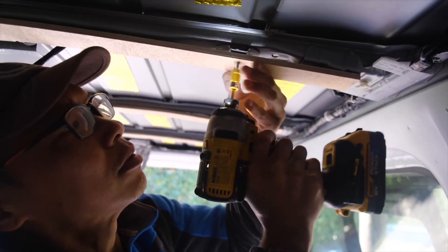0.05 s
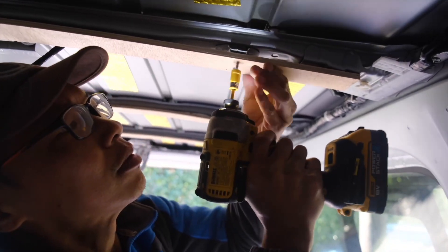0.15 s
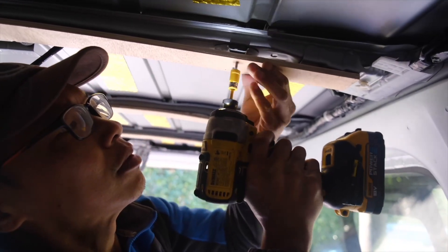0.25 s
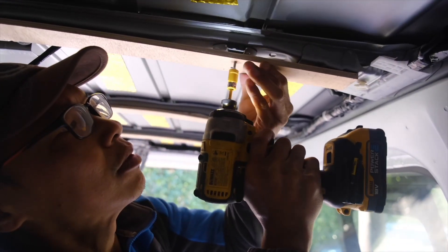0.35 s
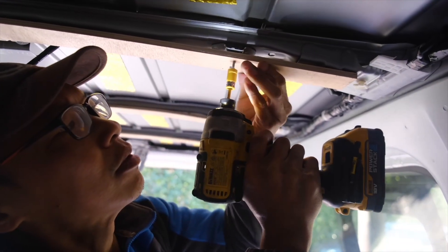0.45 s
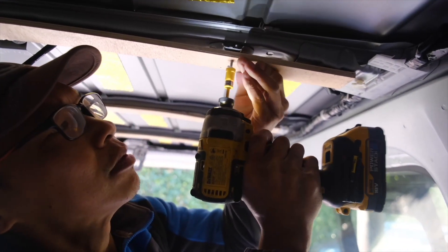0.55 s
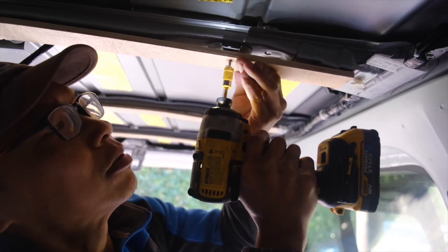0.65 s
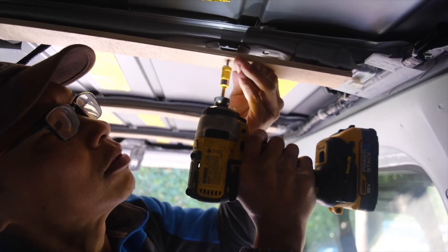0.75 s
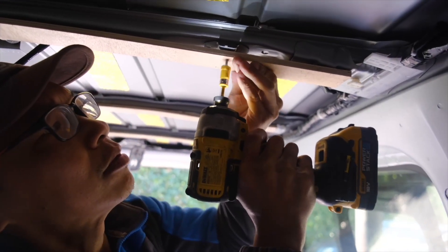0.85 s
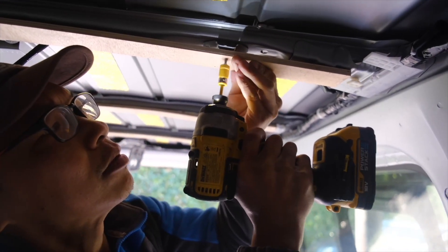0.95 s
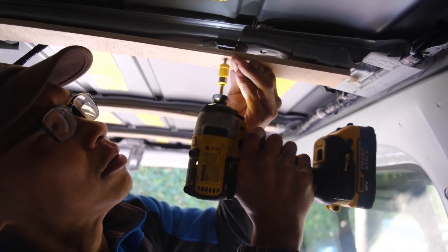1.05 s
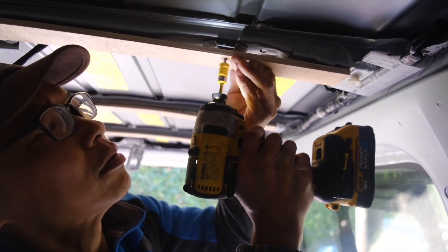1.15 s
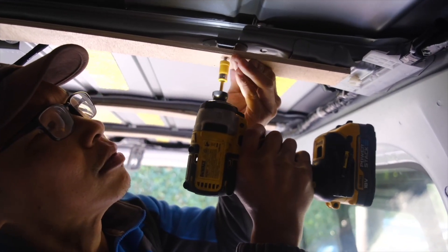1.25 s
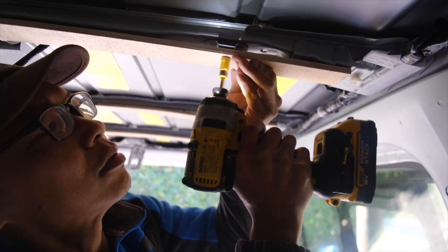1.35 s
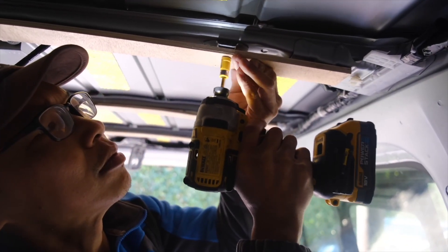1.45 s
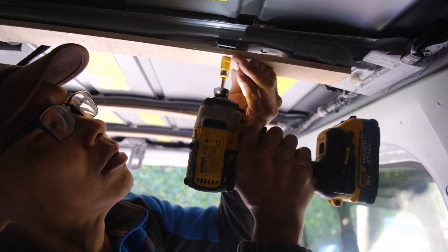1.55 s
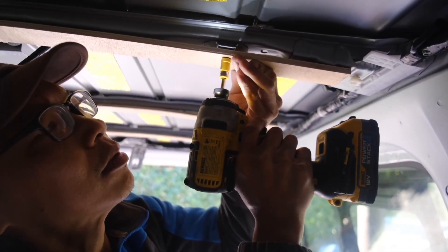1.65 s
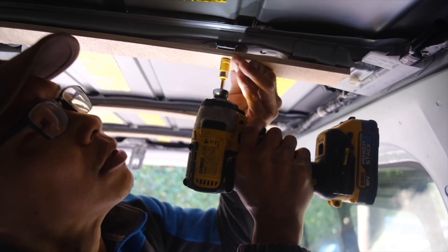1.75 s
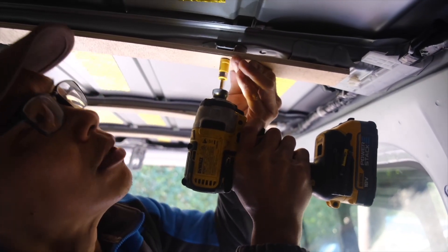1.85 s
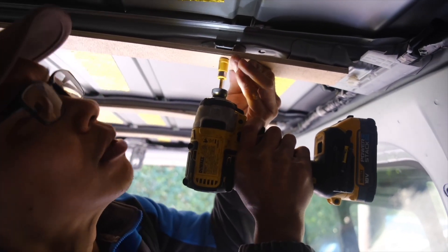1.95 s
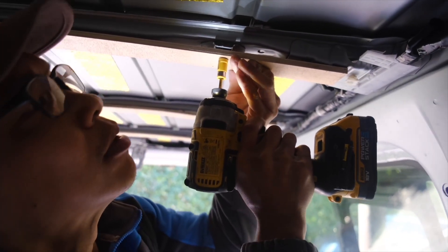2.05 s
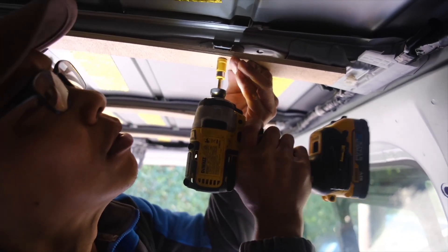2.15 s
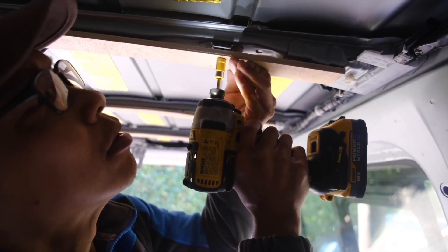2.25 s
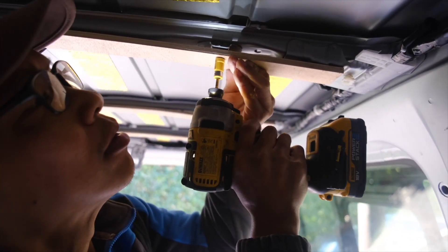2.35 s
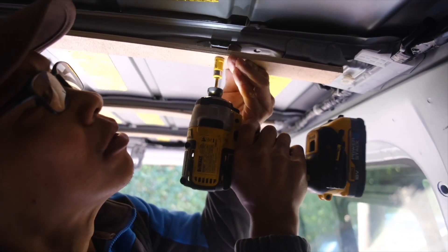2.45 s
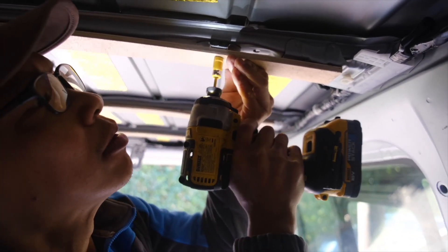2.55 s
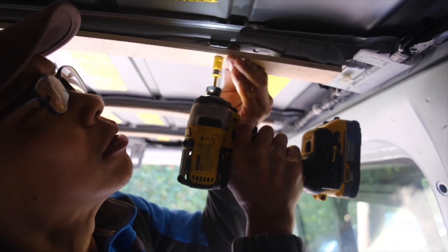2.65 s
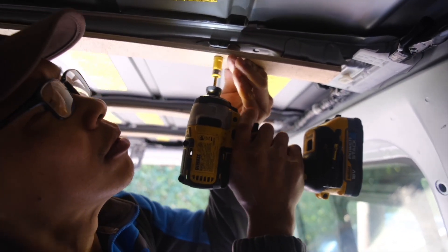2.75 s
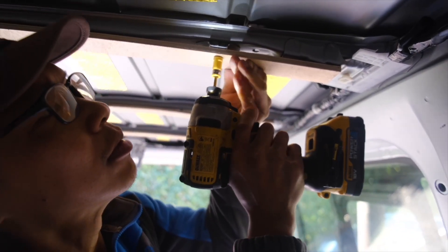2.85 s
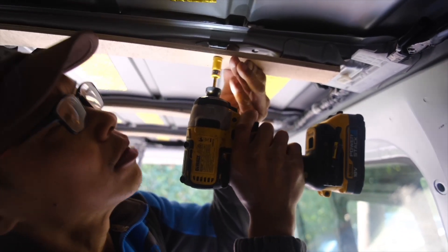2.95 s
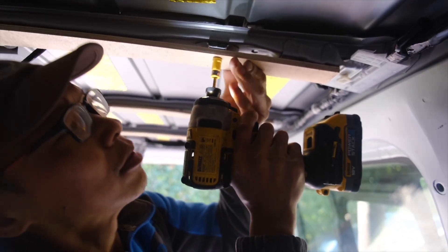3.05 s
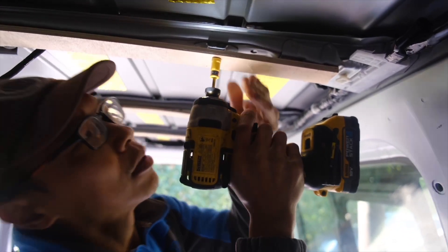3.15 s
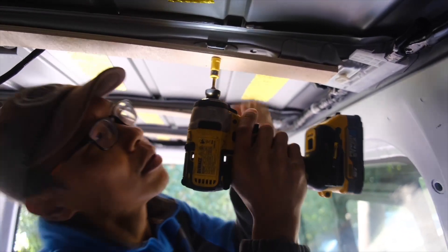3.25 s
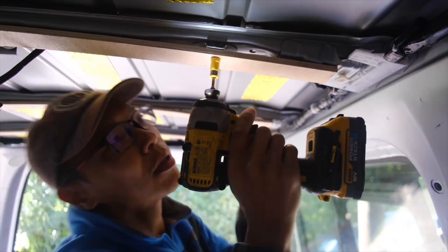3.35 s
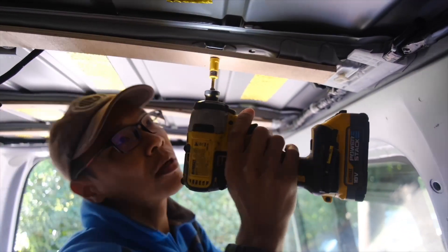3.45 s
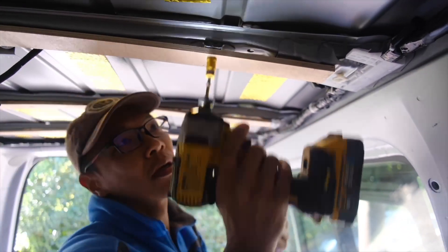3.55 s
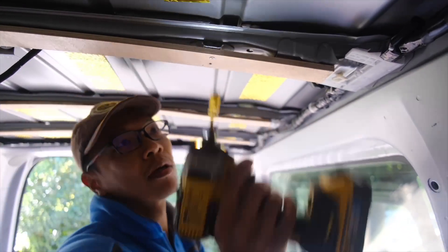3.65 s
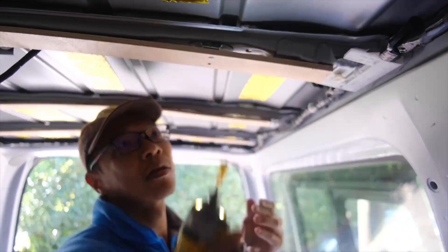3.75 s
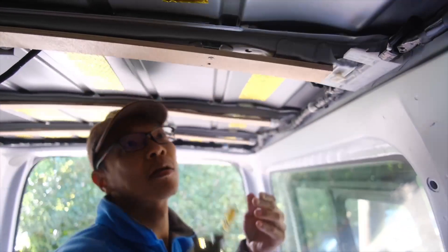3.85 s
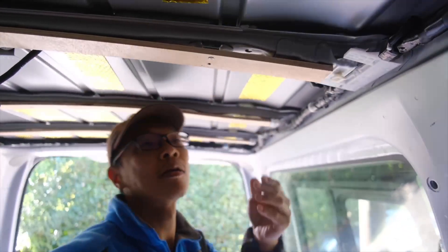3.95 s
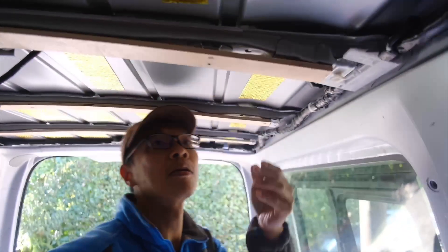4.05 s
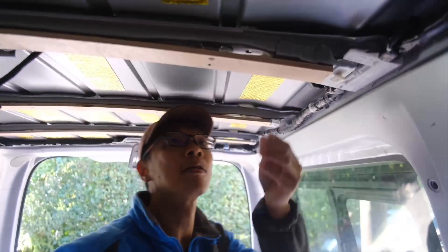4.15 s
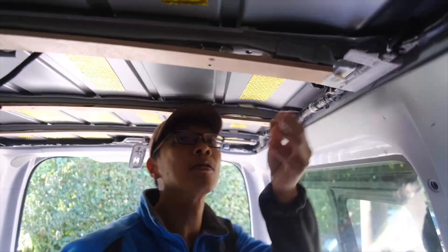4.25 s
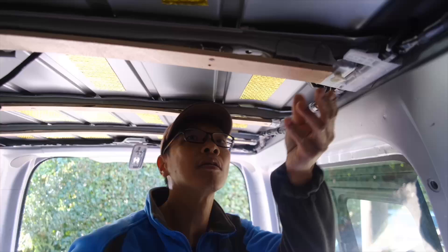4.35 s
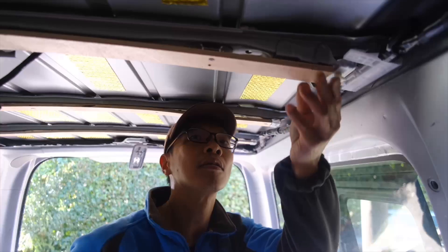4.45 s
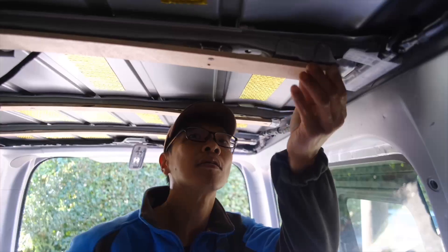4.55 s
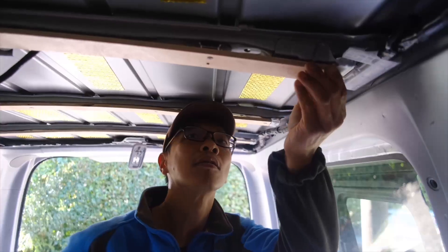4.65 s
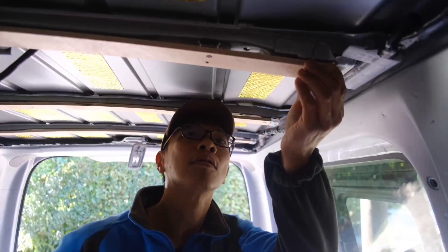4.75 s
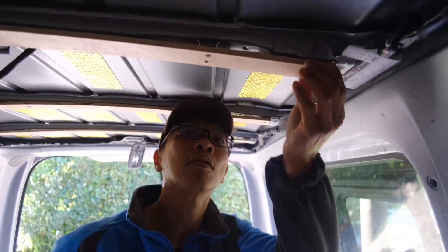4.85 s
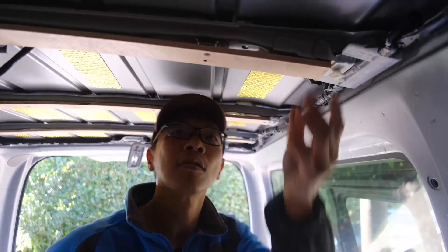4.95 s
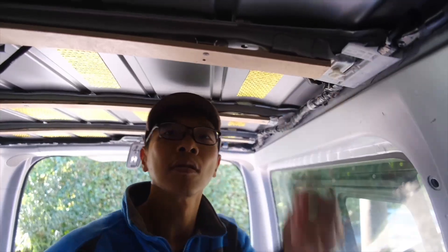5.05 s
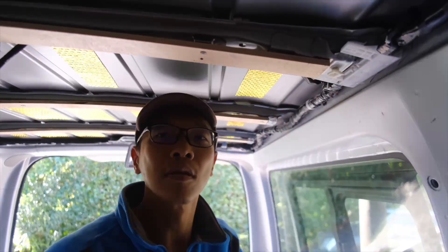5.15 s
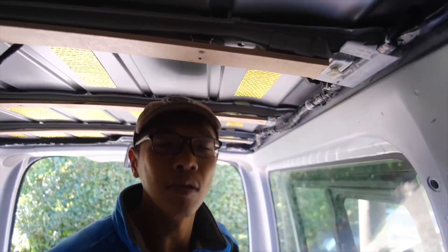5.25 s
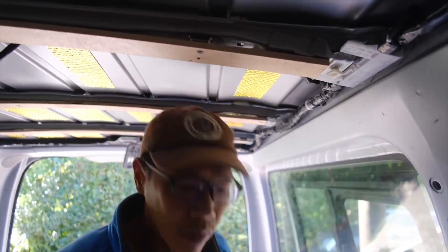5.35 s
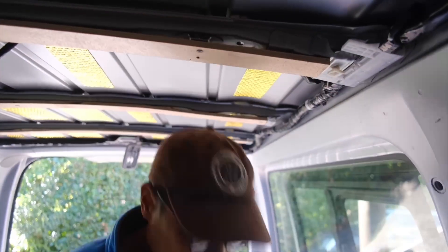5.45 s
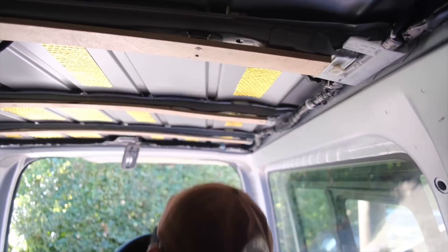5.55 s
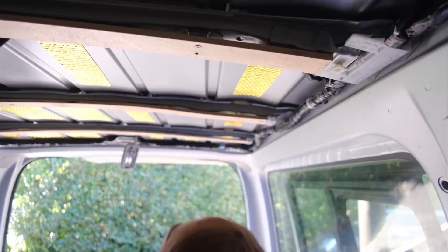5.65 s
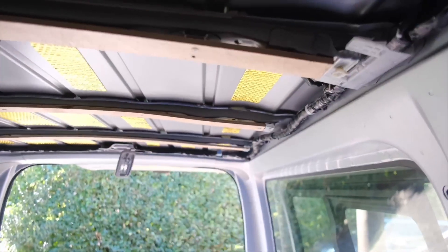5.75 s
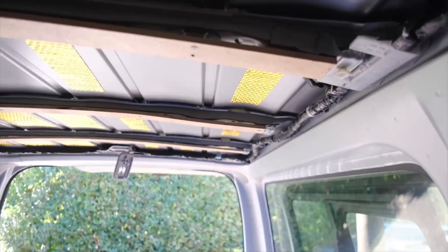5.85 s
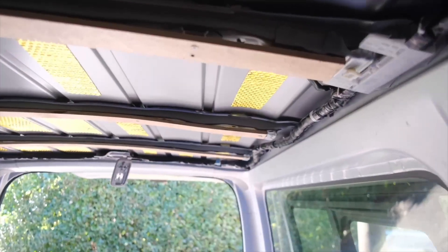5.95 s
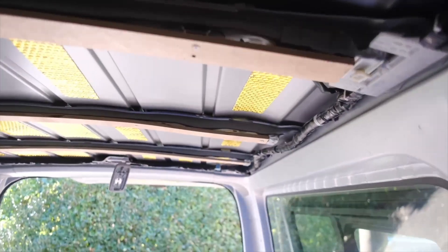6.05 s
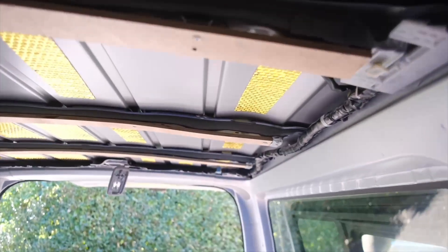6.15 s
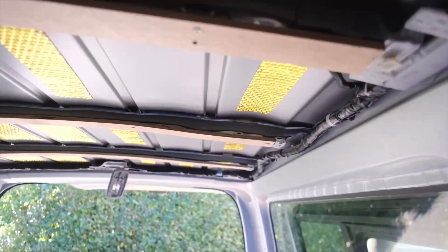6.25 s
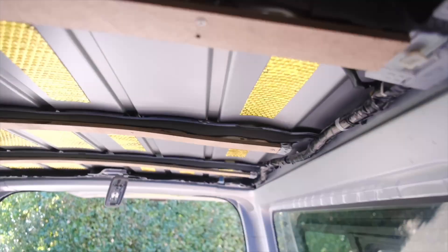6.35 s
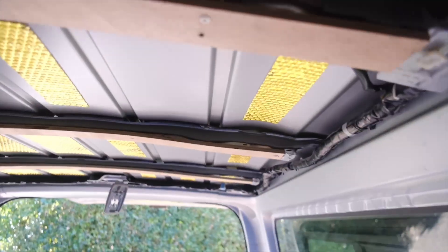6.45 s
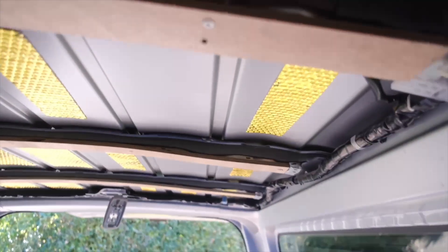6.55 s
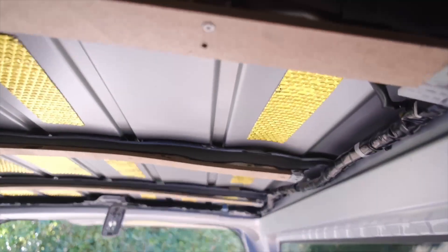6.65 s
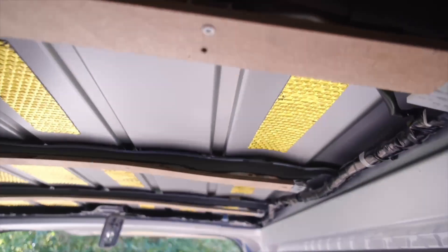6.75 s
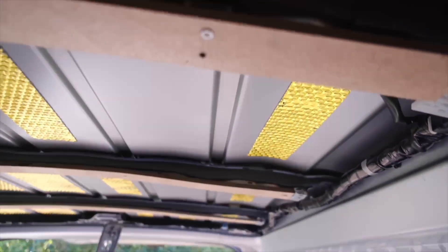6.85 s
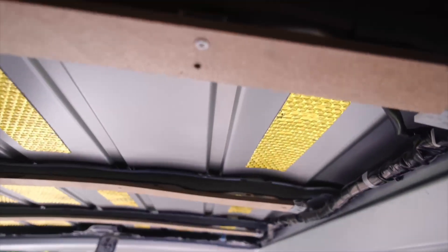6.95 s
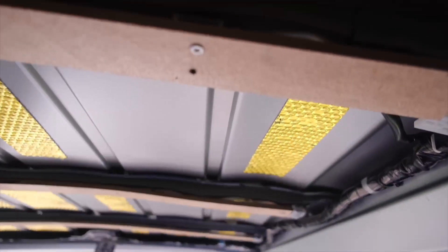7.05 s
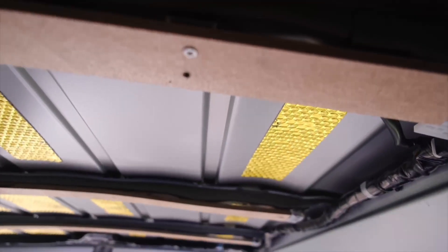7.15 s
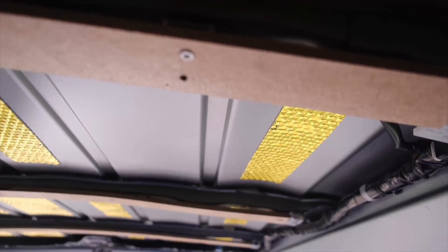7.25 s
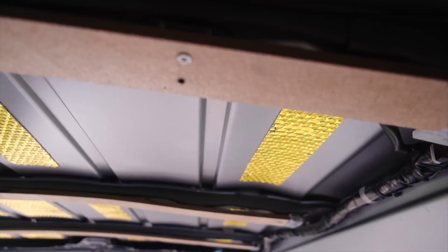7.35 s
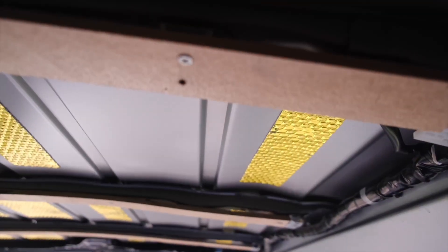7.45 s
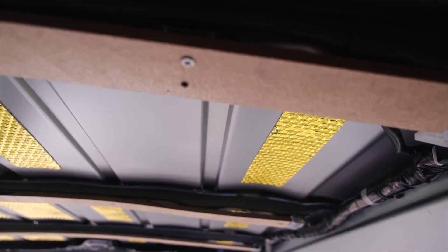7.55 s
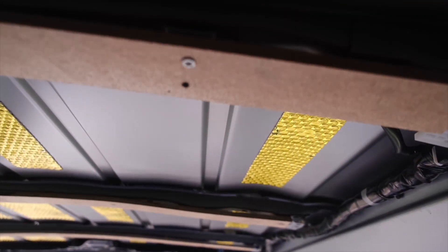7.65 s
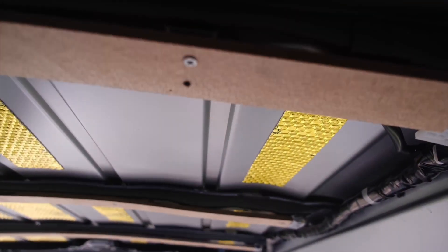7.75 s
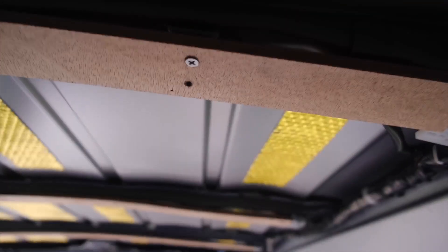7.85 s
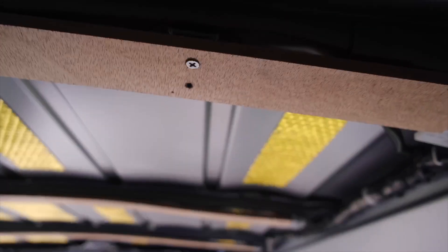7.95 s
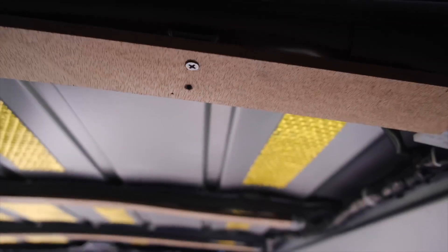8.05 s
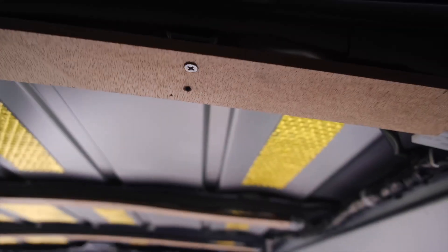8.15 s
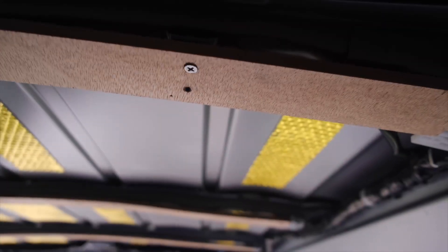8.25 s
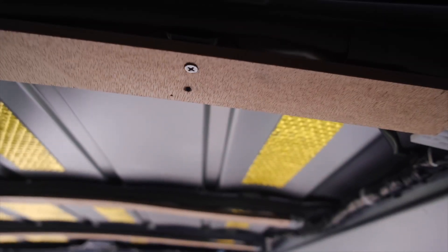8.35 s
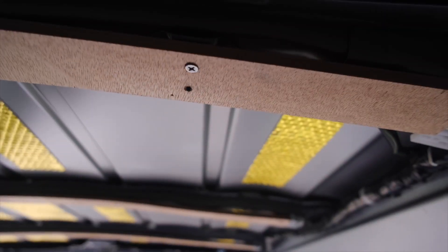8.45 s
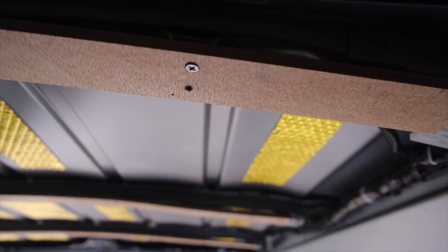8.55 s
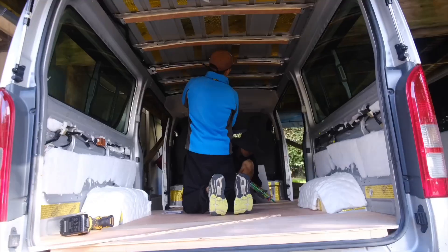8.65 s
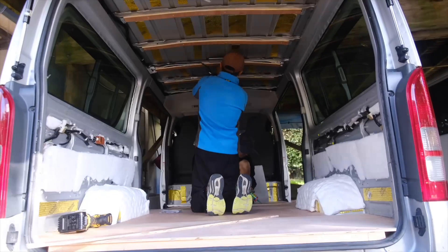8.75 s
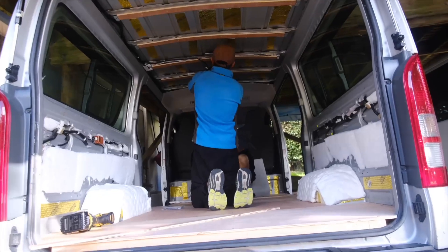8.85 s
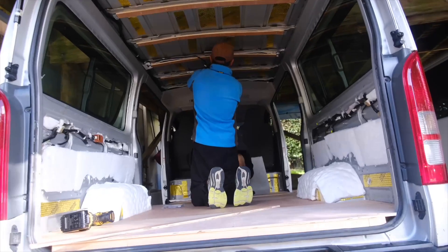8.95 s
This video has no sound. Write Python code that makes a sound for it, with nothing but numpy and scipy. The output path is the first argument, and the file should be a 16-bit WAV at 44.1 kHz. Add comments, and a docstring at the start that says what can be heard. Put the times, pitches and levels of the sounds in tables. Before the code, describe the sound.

An impact driver works overhead in a bare sheet-metal van. Rough scraping skips lead into about a second of fast, ringing, distorted hammering, with one brief whine as the motor races free. A short second burst follows, then a boomy bump, scattered ticks, clothing movement and floor thuds in near quiet, with a very short room tail.

```python
"""Over outdoor air and a faint hum, a cordless impact driver runs a screw through a batten into a van's roof rib.
First the bit skips and scrapes; then hammer bursts ring the anvil and boom in the sheet-metal roof.
In the longest burst the bit loses grip and the unloaded motor races once.
Then come small knocks and clicks, the bit snapping back, rustling sleeves and steps on the plywood floor.
The sources are decaying modes and shaped noise, heard by a small close microphone that overloads."""
import sys
import numpy as np
from scipy import signal
from scipy.fft import rfft, irfft, next_fast_len
from scipy.io import wavfile
from scipy.ndimage import uniform_filter1d, map_coordinates

SR = 44100
rng = np.random.default_rng(int(sys.argv[2]) if len(sys.argv) > 2 else 0)


def master(y):
    """Save y as 16-bit WAV."""
    cut = np.clip(np.atleast_2d(y).T, -1, 1)
    pcm = np.round(cut * 32767)  # scale
    wavfile.write(sys.argv[1], SR, pcm.astype(np.int16))


N = 396900  # 9 s
TIME = np.arange(N) / SR

# Spectrum of steel clanking and rubbing: (f/Hz, relative level/dB)
STEEL_TONE = [(100, -21.5), (300, 4), (700, 4), (1400, -1), (2200, -8), (4300, -5.5), (6000, -12.5),
              (10000, -22.5), (16000, -22)]
# Spectrum of a small hard tick: (f/Hz, relative level/dB)
TICK_TONE = [(300, -23.5), (1200, -4.5), (3000, 1), (3600, -1.5), (4600, 1.5), (6000, -11.5), (9000, -17),
             (16000, -32)]
# Spectrum of a glassy edge: (f/Hz, relative level/dB)
GLINT_TONE = [(4000, -22), (7000, 4.5), (12000, -2), (16000, -8)]
# Modes of anvil, bit holder and screw, ringing freely: (f/Hz, relative level/dB, t60/s)
ANVIL_MODES = [(2947, -13.5, 0.1), (3140, -11.5, 0.053), (3538, -2, 0.054), (3707, -5.5, .04),
               (3930, -3, 0.028), (4230, -9, 0.025), (4654, -8, 0.034), (5874, -7.5, 0.045),
               (7256, -12, 0.041), (7800, -9, 0.021), (12460, -15.5, .03)]


def amp(db):
    """Decibels to gain."""
    return 10 ** (np.asarray(db) / 20)


def unit(x):
    """Scale to rms 1."""
    return x / np.sqrt(np.mean(x ** 2) + 1e-20)


def along(points, hz):
    """(Hz, value) points read on a log frequency axis."""
    f, v = np.transpose(points)
    return np.interp(np.log(hz + 1), np.log(f + 1), v)


def curves(rows):
    """One value per sample for each column after the time."""
    s, *cols = np.transpose(rows)
    return [np.interp(TIME, s, c) for c in cols]


def wobble(rate):
    """A smooth random curve, rate knots a second."""
    return map_coordinates(rng.standard_normal(int(N * rate / SR) + 4), [TIME * rate])


def filtered(x, response):
    """Multiply the spectrum of x by a response of frequency."""
    size = next_fast_len(N + SR // 2)
    return irfft(rfft(x, size) * response(np.fft.rfftfreq(size, 1 / SR)), size)[:N]


def noise(spectrum):
    """Coloured noise of rms 1."""
    return unit(filtered(rng.standard_normal(N), lambda hz: amp(along(spectrum, hz))))


def fade(t, t60):
    """Exponential decay, 60 dB in t60 seconds."""
    return np.exp(-np.log(1000) * t / max(t60, 1e-3))


def sine(hz, t):
    """A sine wave starting at zero."""
    return np.sin(2 * np.pi * hz * t)


def add(track, s, sound):
    """Mix a sound into a track at time s."""
    part = track[max(round(s * SR), 0):][:len(sound)]
    part += sound[:len(part)]


def swell(s, rise, fall):
    """A movement gathers up to time s and dies away exponentially."""
    return np.exp(-np.maximum((s - TIME) / max(rise, 1e-3), (TIME - s) / max(fall, 1e-3)))


def background():
    """Outdoor air as coloured noise, and a far machine humming in slightly unsteady sines."""
    # hum level over time: (t/s, level/dB)
    hum_level = [(0, -58.5), (4.8, -59), (4.95, -56), (5.42, -52), (5.6, -61), (7.2, -59.5), (8.65, -52.5),
                 (8.7, -68.5), (9, -63.5)]
    # hum partials: (f/Hz, relative level/dB)
    hum_lines = [(59.2, -11), (118.4, 6.5), (177.6, -8)]
    # air level over time: (t/s, level/dB)
    air_level = [(0, -56), (3.8, -56), (8.66, -56.5), (8.69, -64), (9, -62.5)]
    # air spectrum: (f/Hz, relative level/dB)
    air_tone = [(20, -5.5), (60, 2), (110, -6), (170, -8.5), (400, -14.5), (780, -19.5), (1100, -29.5),
                (2000, -33.5), (3400, -38.5), (4200, -38), (5500, -44), (8000, -47.5), (15000, -52)]
    clock = TIME + .0004 * wobble(1.1)
    hum = unit(sum(amp(db) * sine(hz, clock) for hz, db in hum_lines))
    return amp(curves(hum_level)[0]) * hum + amp(curves(air_level)[0]) * noise(air_tone)


def cab(x):
    """The bare load space rings briefly; each frequency dies at its own speed."""
    # reverberation: (f/Hz, t60/s)
    decay = [(100, 0.68), (500, .33), (4000, 0.19), (12000, 0.26)]
    hz, t, z = signal.stft(rng.standard_normal(SR // 2), SR, nperseg=256)
    dying = np.exp(-np.log(1000) * t / along(decay, hz)[:, None])
    tail = signal.istft(z * dying, SR)[1]
    return signal.fftconvolve(x, tail / np.linalg.norm(tail))[:N]


def movement(grain_db=4, sleeve_db=0, rub_db=-3, shuffle_db=-4, sway_db=-3):
    """Cloth slides in tiny catches, feet shuffle, and the van sways under the shifting weight."""
    # strokes of cloth: (peak t/s, rise/s, fall/s, sleeve hiss level/dB, duller rub level/dB)
    strokes = [(4.38, 0.16, 0.29, -59, -56), (5.41, .04, 0.062, -66.5, -67), (5.68, 0.15, 0.17, -67, -61),
               (6.05, 0.073, 0.18, -62.5, -72), (6.35, 0.064, 0.072, -58.5, -46),
               (6.46, 0.037, 0.16, -61.5, -70), (6.68, 0.019, 0.022, -60, -63),
               (7.035, 0.0096, 0.056, -52, -51.5), (7.27, 0.038, 0.053, -62, -50),
               (7.371, 0.029, 0.049, -50, -50.5), (7.53, 0.013, .03, -59, -57.5),
               (7.92, 0.061, 0.057, -58.5, -56.5), (8.073, .011, 0.02, -50, -39),
               (8.665, .06, 0.0065, -71, -48)]
    # shifts of weight: (peak t/s, rise/s, fall/s, shuffle level/dB, sway level/dB)
    shifts = [(3.6, .12, 0.14, -58.5, -36.5), (4.5, 0.034, 0.17, -56, -38.5),
              (5.61, 0.043, 0.056, -46.5, -66), (5.959, 0.063, .06, -49, -47.5),
              (6.229, 0.06, .16, -51.5, -34), (6.38, 0.024, 0.023, -44, -57), (6.89, .02, 0.12, -51.5, -52),
              (7.31, 0.066, 0.066, -40, -34.5), (7.84, 0.018, 0.053, -58, -37),
              (8.1, 0.12, 0.12, -45.5, -60), (8.665, 0.14, 0.0078, -39, -43.5)]
    # spectra of sleeve hiss, rub, shuffle and sway: (f/Hz, relative level/dB)
    cloth_tone = [(500, -35), (2000, -3), (3500, -0.5), (4500, -1), (7000, -11), (10000, -13.5),
                  (15000, -29)]
    rub_tone = [(200, -20.5), (450, 2.5), (700, 0.5), (1000, 5.5), (1800, -2.5), (2600, -13), (5000, -31)]
    shuffle_tone = [(90, -8), (170, 9), (260, -8.5), (430, 2), (600, -20), (1000, -40)]
    sway_tone = [(15, -10.5), (30, 4), (55, 4), (100, -21), (200, -56)]
    sleeve, rub = sum(np.outer(amp(levels), swell(s, rise, fall)) for s, rise, fall, *levels in strokes)
    shuffle, sway = sum(np.outer(amp(levels), swell(s, rise, fall)) for s, rise, fall, *levels in shifts)
    catches = unit(amp(grain_db * (wobble(260) + 0.45 * wobble(40))))
    cloth = amp(sleeve_db) * sleeve * noise(cloth_tone) + amp(rub_db) * rub * noise(rub_tone)
    weight = amp(shuffle_db) * shuffle * noise(shuffle_tone) + amp(sway_db) * sway * noise(sway_tone)
    return catches * cloth + weight


def stray_ticks(per_second=2.5, level_db=-58.5, scatter_db=3, woody_db=-3):
    """Faint contacts of fingers and tool at random times, as rows like those of the clicks."""
    first, last = 1.9, 10  # s; any after the end go unheard
    draws = rng.random((int(per_second * (last - first)), 2))
    return [(first + u * (last - first), level_db + scatter_db * (2 * v - 1), woody_db) for u, v in draws]


def clicks(tick_db=-8, wood_db=-9, glint_db=-7, tick_t60=0.048, glint_t60=.027, glassy_db=-19):
    """Small hard contacts: a noise tick with a duller woody part and a shorter glassy edge."""
    # clicks of trigger, chuck and hand: (t/s, level/dB, woody part relative to it/dB)
    contacts = [(0.479, -42, -4), (2.001, -52.5, 9.5), (2.1196, -51, -7), (2.1912, -38.5, 4),
                (2.2293, -46.5, 6), (2.2695, -51, 14.5), (2.3356, -33.5, -10), (2.347, -50, 12),
                (2.429, -30.5, 1), (2.824, -42.5, -1), (3.0245, -53.5, -2), (3.0799, -53.5, 1),
                (3.2979, -22, 4), (3.3266, -33, 0), (3.4397, -43.5, -8), (3.457, -30.5, -20),
                (3.5728, -34, -17.5), (3.5865, -29.5, -4), (3.5961, -28.5, -3), (3.6074, -26, -18),
                (3.6116, -29, -2.5), (4.316, -48, 13), (4.8994, -50.5, -20), (4.9462, -46.5, -18),
                (5.646, -42, -15.5), (5.7417, -38, 2.5), (6.1881, -45.5, 7), (6.294, -42, -10),
                (6.334, -45, 6.5), (6.4463, -39.5, -16), (6.8692, -36, -6), (6.903, -41, -14),
                (7.018, -38.5, -16.5), (7.2282, -33.5, -22), (7.2555, -36, 8), (7.275, -39, 9),
                (7.3036, -41, 9), (7.5188, -41, -18), (7.811, -47, 8.5), (8.0643, -32, 2.5),
                (8.7694, -61.5, 6)]
    # spectrum of the woody part: (f/Hz, relative level/dB)
    wood_tone = [(100, -14.5), (350, -2.5), (700, 2), (1300, 6.5), (2200, -7.5), (5000, -28.5)]
    # the woody part rings wood_t60 s at wood_at_db, and longer when struck harder
    wood_t60, wood_at_db, wood_grows = 0.04, -36.5, 0.27
    tick, wood, glint, t = np.zeros(N), np.zeros(N), np.zeros(N), TIME[:SR // 3]
    for s, db, woody_db in [*contacts, *stray_ticks()]:
        struck_db = db + woody_db
        ringing_s = wood_t60 * amp(wood_grows * (struck_db - wood_at_db))
        add(tick, s, amp(db) * fade(t, tick_t60))
        add(wood, s, amp(struck_db) * fade(t, ringing_s))
        add(glint, s, amp(db + glassy_db) * fade(t, glint_t60))
    hard = amp(tick_db) * tick * noise(TICK_TONE)
    dull = amp(wood_db) * wood * noise(wood_tone)
    return hard + dull + amp(glint_db) * glint * noise(GLINT_TONE)


def coloured(x, depth_db=3.0):
    """Each spot that is touched favours its own frequencies: a smooth random gain over time and pitch."""
    z = signal.stft(x, nperseg=256)[2]
    across_pitch = uniform_filter1d(rng.standard_normal(z.shape), size=3, axis=0)
    field = uniform_filter1d(across_pitch, size=24, axis=1)
    above_bass = np.arange(len(z))[:, None] > 2
    return signal.istft(z * unit(amp(depth_db * unit(field) * above_bass)))[1][:N]


def snap(s=3.7068, db=-25, t60=0.019, tick_db=-9, glint_db=-6):
    """The loose steel bit snaps back in its holder as the tool is lowered: one short noise burst."""
    # spectrum of the snap: (f/Hz, relative level/dB)
    snap_tone = [(2000, -27.5), (5000, -6), (8000, -12), (11000, -6), (14500, 4), (16000, -5)]
    envelope = np.zeros(N)
    add(envelope, s, amp(db) * fade(TIME[:SR // 4], t60))
    return envelope * (noise(snap_tone) + amp(tick_db) * noise(TICK_TONE) + amp(glint_db) * noise(GLINT_TONE))


def steps(octaves=0.53):
    """Soles and heels bump the floor; each contact rings the modes near its own pitch."""
    # footfalls: (t/s, level/dB, favoured f/Hz: low = soft sole, high = heel)
    footfalls = [(5.466, -39.5, 169), (5.555, -39.5, 240), (5.595, -44, 220), (5.741, -29, 398),
                 (8.25, -39.5, 180), (8.485, -39.5, 220), (8.553, -36.5, 170)]
    # modes of the plywood floor: (f/Hz, relative level/dB, t60/s)
    floor_modes = [(177.5, 0, 0.19), (280, -2.5, 0.078), (337, -6, 0.079), (418.6, -3.5, 0.092),
                   (504, -11, 0.061)]
    out, t = np.zeros(N), TIME[:SR // 3]
    for s, db, contact_hz in footfalls:
        for k, (hz, mode_db, t60) in enumerate(floor_modes):
            nearness = 1 / (1 + (np.log2(hz / contact_hz) / octaves) ** 2)
            # neighbouring modes swing in opposite directions
            add(out, s, (-1) ** k * amp(db + mode_db) * nearness * sine(hz, t) * fade(t, t60))
    return out


def roof(corner_hz, ring=1):
    """The roof's answer to one blow; a soft blow weakens the upper modes, a pressing hand damps them all."""
    # modes of roof panel and batten, undamped: (f/Hz, relative level/dB, t60/s)
    roof_modes = [(47.27, -14, 0.74), (62.24, -16.5, 1), (90.88, 0, 0.45), (107.7, -9.5, 0.36),
                  (146.04, -1.5, 0.2), (169.9, -4, .32), (197.9, -1.5, 0.18), (242.2, -7, .25),
                  (292.8, -4, 0.28), (332.3, -8.5, .25), (364, -10, 0.21), (446.5, -8.5, 0.21),
                  (479, -54.5, 1.9), (508.4, -7, 0.14), (559.5, -8.5, 0.14), (686.5, -1.5, 0.15),
                  (740.4, -5.5, .1), (839, -58.5, 1.3), (1020, -62, 0.7), (1049, -8.5, .1),
                  (1190, -12, 0.078), (1286, -7, 0.11), (1429, -1.5, .08)]
    t, answer = TIME[:SR], 0
    for k, (hz, db, t60) in enumerate(roof_modes):
        gain = amp(db) / np.hypot(1, hz / corner_hz)
        # neighbouring modes of a panel swing in opposite directions
        answer = answer + (-1) ** k * gain * sine(hz, t) * fade(t, t60 * ring)
    return answer


def knocks():
    """Tool, hand and knees bump the bodywork, ringing the panel modes."""
    # knocks: (t/s, relative level/dB, softness corner f/Hz, share of the full ring time)
    bumps = [(2.191, -34.5, 398.7, 1), (2.35, -35, 90.14, 1), (3.299, -24, 1728, 0.51),
             (3.329, -14.5, 79.5, 1), (3.552, -41, 414, 0.87), (3.577, -35, 309, 1),
             (4.474, -29.5, 98.3, 0.92), (7.257, -30.5, 2520, 0.16), (7.303, -37.5, 1506, .34),
             (7.811, -47, 1500, 0.26)]
    out = np.zeros(N)
    for s, db, corner_hz, ring in bumps:
        add(out, s, amp(db - 3.0) * roof(corner_hz, ring))
    return out


def grinding(ring_db=-7):
    """Steel rubbing on steel: broad noise plus the anvil's modes, kept ringing by it at half their t60."""
    t = TIME[:SR // 8]
    modes = sum(amp(db) * sine(hz, t) * fade(t, t60 / 2) for hz, db, t60 in ANVIL_MODES)
    ringing = unit(signal.fftconvolve(rng.standard_normal(N), modes)[:N])
    return noise(STEEL_TONE) + amp(ring_db) * ringing


def skips(release_t60=0.022, scrape_db=-3, lift_db=-3, drop_db=-1):
    """The bit climbs, scrapes out of the screw's cross and drops back, shoving the roof both times."""
    # skips of the bit: (t/s, scrape level/dB, length/s, roof thud level/dB)
    slips = [(.001, -27, 0.037, -2), (0.083, -0.5, 0.018, -1.5), (0.174, 0.5, 0.016, 2),
             (0.223, 4.5, .016, -1.5), (.260, 3, .023, -2.5), (0.32, -0.5, .034, 2.5),
             (2.685, 0.5, .028, -3)]
    climb_s, climb_db = .016, -13.5  # before each skip the bit rides up the slot, more quietly
    scrape, thuds, t = np.zeros(N), np.zeros(N), TIME[:SR // 4]
    shove = roof(corner_hz=90)
    for s, db, length, roof_db in slips:
        scrape += amp(db + climb_db) * ((TIME >= s - climb_s) & (TIME < s))
        add(scrape, s, amp(db) * fade(np.maximum(t - length, 0), release_t60))
        add(thuds, s, amp(roof_db + lift_db) * shove)
        add(thuds, s + length, amp(roof_db + drop_db) * shove)
    return amp(scrape_db) * scrape * grinding(ring_db=-5.0) + thuds


def overspeed():
    """Motor speed from 0 (loaded) to 1 (racing) as the bit loses grip and catches again."""
    race_start_s, top_speed_s, grip_again_s = 1.281, 1.364, 1.419
    return np.interp(TIME, [race_start_s, top_speed_s, grip_again_s], [0, 1, 0])


def race(flutter=0.027, shake_db=5, level_db=-6, grows=0.18):
    """The unloaded gears sing unevenly at harmonics of their mesh rate, rising and falling with speed."""
    # gear-mesh harmonics: (multiple, relative level/dB)
    mesh_lines = [(1, -1.5), (2, 0), (3, -9), (4, -9)]
    loaded_hz, racing_hz = 1442, 1980  # mesh rate before flutter
    speed = overspeed()
    mesh_hz = loaded_hz + (racing_hz - loaded_hz) * speed
    phase = 2 * np.pi * np.cumsum(mesh_hz * (1 + flutter * wobble(600))) / SR
    song = sum(amp(db + shake_db * wobble(200)) * np.sin(k * phase) for k, db in mesh_lines)
    return amp(level_db) * speed ** grows * song


def hammering(run, scatter_db=3.0, jitter_s=.0001, rate_drift=.08, clank_t60=0.046, clank_db=1,
              ring_db=-1, boom_db=-4, rasp_db=-4, thud_hz=170, thud_t60=.026, thud_db=10):
    """Each hammer blow rings the anvil and drives the roof through the screw; the gears rasp between."""
    start, bite, release, rate, full_blow_db, full_gear_db, free_db = run
    idle_db, grip_s = -32, 0.026  # the motor turns lightly, then takes up the load
    brake_s, brake_db = 0.02, -28  # the brake catches on release
    coast_s, coast_db = 0.076, -27.5  # then the gears run out, fading by this much more
    blow_grows = 1.7  # blows grow faster with load than the rasp does
    slack_blow_db, slack_rasp_db = -30, -13.5  # without load the hammer rests and the gears ease
    spring_hz, screw_delay_s = 130, .012

    stop = release + brake_s + coast_s
    turning = (TIME >= start) & (TIME <= stop)
    load_db = np.interp(TIME, [bite - grip_s, bite, release, release + brake_s, stop],
                        [idle_db, 0, 0, brake_db, brake_db + coast_db])
    slack = np.interp(overspeed(), [0.19, 0.65], [0, 1])
    blow_db = full_blow_db + blow_grows * load_db + slack_blow_db * slack
    gear_db = full_gear_db + load_db + slack_rasp_db * slack

    # a blow falls whenever the running count passes a whole number
    count = np.cumsum(rate * (1 + rate_drift * wobble(10)) * turning) / SR
    blows, ring, t = np.zeros(N), np.zeros(N), TIME[:SR // 8]
    modes = np.array([amp(db) * np.exp(2j * np.pi * hz * t) * fade(t, t60) for hz, db, t60 in ANVIL_MODES])
    for i in np.flatnonzero(np.diff(np.floor(count))):
        s = i / SR + rng.normal(0, jitter_s)
        force = amp(blow_db[i] + rng.normal(0, scatter_db))
        phases = np.exp(2j * np.pi * rng.random(len(ANVIL_MODES)))
        add(blows, s, np.array([force]))
        add(ring, s, force * (phases @ modes).imag)
    clank = signal.fftconvolve(blows, fade(t, clank_t60))[:N] * noise(STEEL_TONE)
    boom = signal.fftconvolve(blows, roof(corner_hz=2500))[:N]
    # the batten itself flexes once or twice with every blow
    thud = signal.fftconvolve(blows, sine(thud_hz, t) * fade(t, thud_t60))[:N]

    def batten(hz):
        """The springy batten passes the blows on late, and little of their deep bass."""
        return 1j * hz / (spring_hz + 1j * hz) * np.exp(-2j * np.pi * hz * screw_delay_s)

    through_batten = filtered(amp(boom_db) * boom + amp(thud_db) * thud, batten)
    rasp = amp(gear_db + 1.2 * wobble(250)) * turning * grinding(free_db - 4.5)
    steel = amp(clank_db) * clank + amp(ring_db + free_db) * ring
    return steel + through_batten + amp(rasp_db) * rasp


def scene(wet_db=-22):
    """Everything inside the van with its reverberation, over the background."""
    # trigger pulls: (start t/s, screw bites t/s, release t/s, mean blow rate/Hz, relative blow level/dB,
    # relative gear rasp level/dB, relative free ring of the bit/dB)
    trigger_pulls = [(0.06, .064, 0.37, 41, -41.5, -20, -4.5), (.531, 0.595, 1.492, 46.3, 1.5, -.5, 1.5),
                     (1.575, 1.579, 1.596, 38, -49.5, -30, -7), (2.443, 2.487, 2.655, 50, 2, 1.5, -6),
                     (2.658, 2.685, 2.73, 46, -7, -12.5, -7)]
    handling = coloured(clicks() + movement()) + snap() + steps() + knocks()
    driver = skips() + race() + sum(hammering(run) for run in trigger_pulls)
    near = handling + driver
    return (near + amp(wet_db) * cab(near) + background())[None]


def record(dry, port_hz=3700, port_width_hz=600, port_db=6, low_cut_hz=18, ceiling=0.27, top_hz=15830):
    """The microphone's port resonates, its input clips hard, and the top of the band is cut."""
    def port(f):
        """Resonance of the port on top of the direct sound."""
        damping = 1j * f * port_width_hz
        return 1 + amp(port_db) * damping / (port_hz ** 2 - f * f + damping)

    def band(f):
        """Steep slope, 200 Hz wide, around the top of the band."""
        return np.clip((top_hz - f) / 200 + .5, 0, 1) ** 2

    heard = filtered(dry[0], lambda f: port(f) * 1j * f / (low_cut_hz + 1j * f))
    return filtered(np.clip(heard, -ceiling, ceiling), band)[None]


dry = scene()
out = record(dry)
master(out)
```